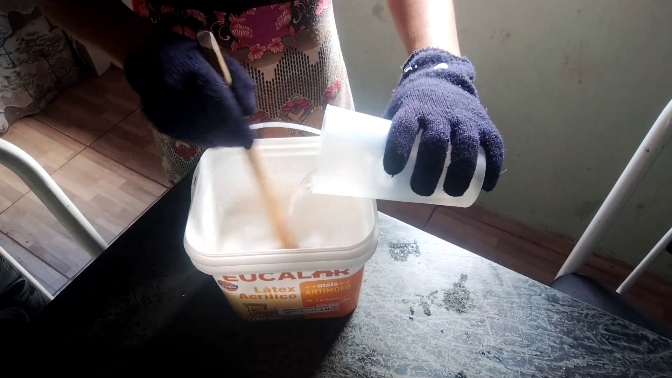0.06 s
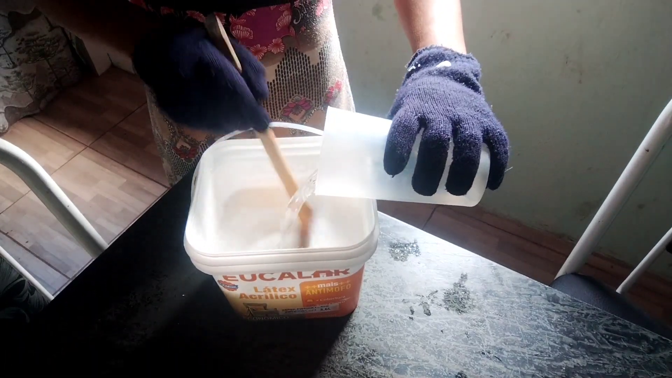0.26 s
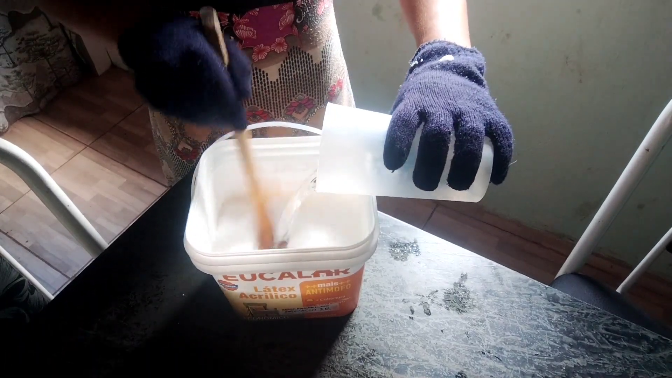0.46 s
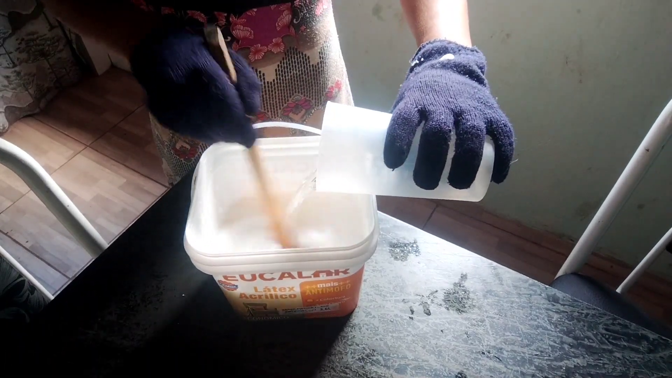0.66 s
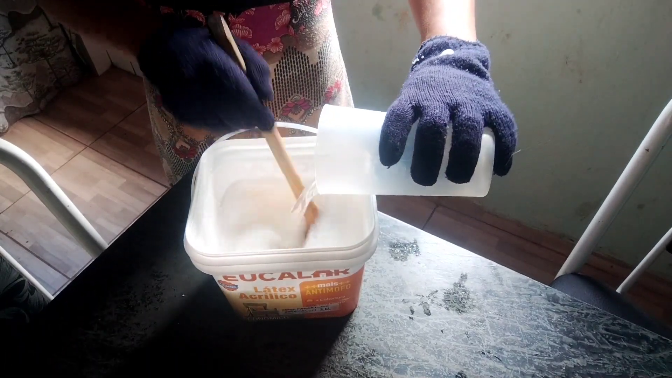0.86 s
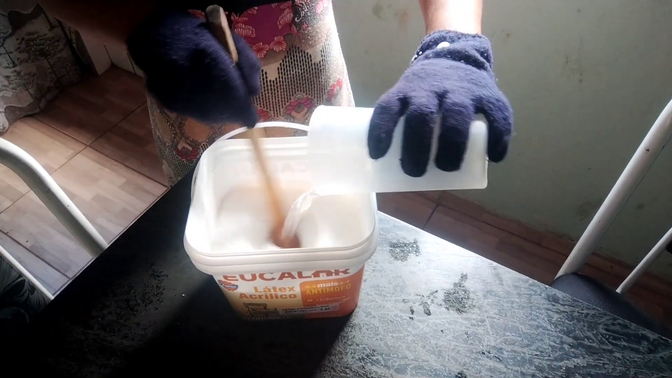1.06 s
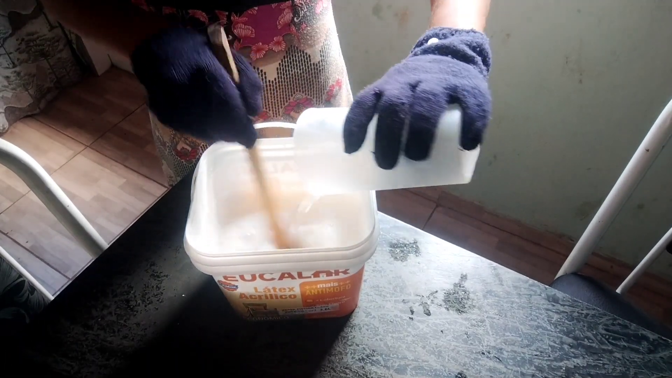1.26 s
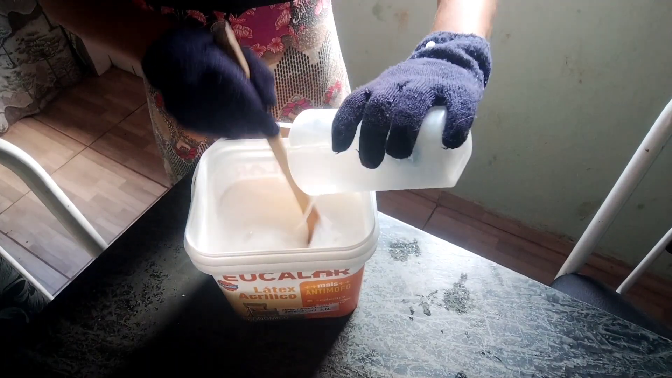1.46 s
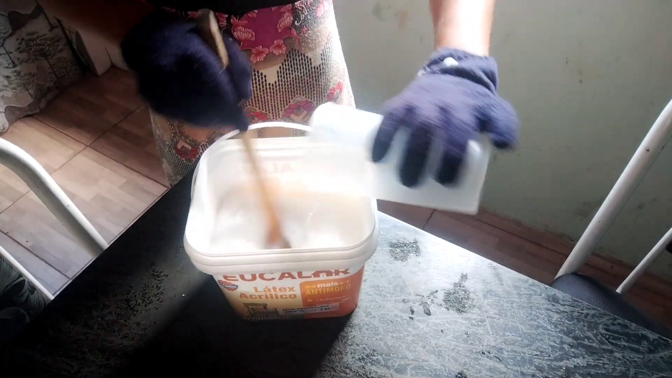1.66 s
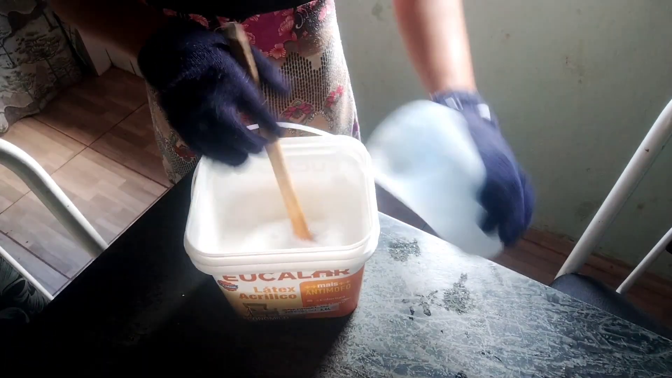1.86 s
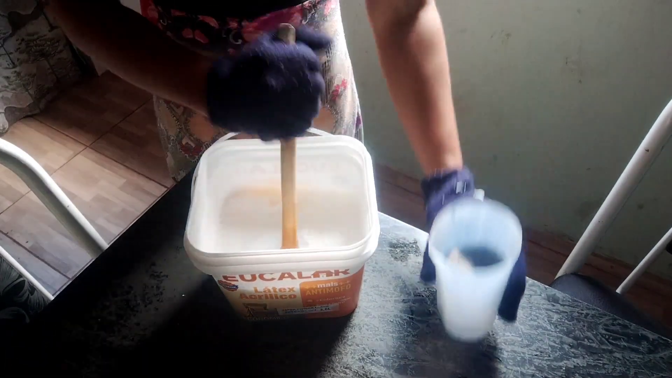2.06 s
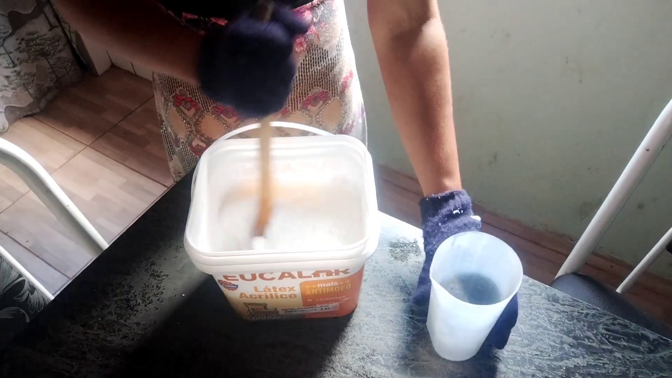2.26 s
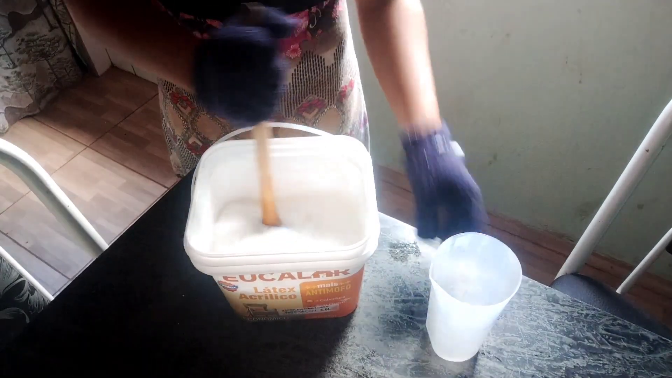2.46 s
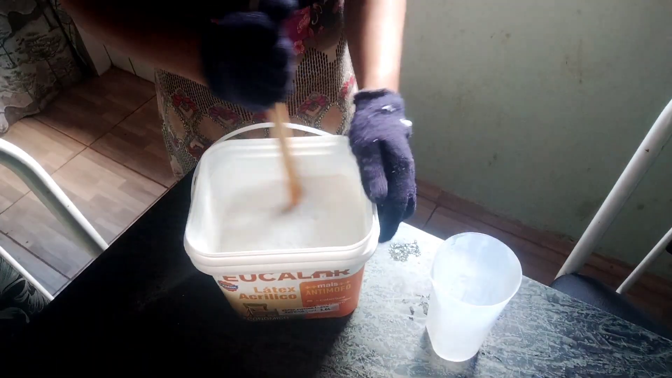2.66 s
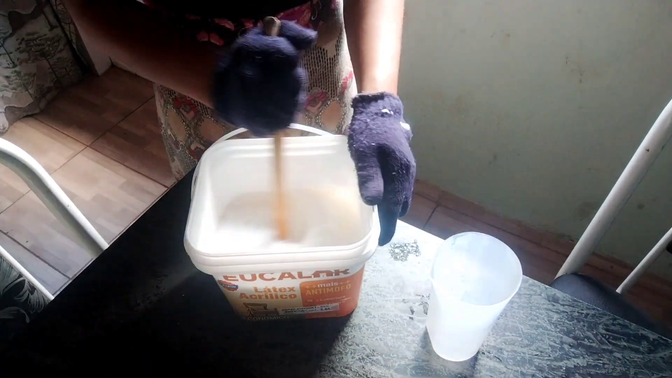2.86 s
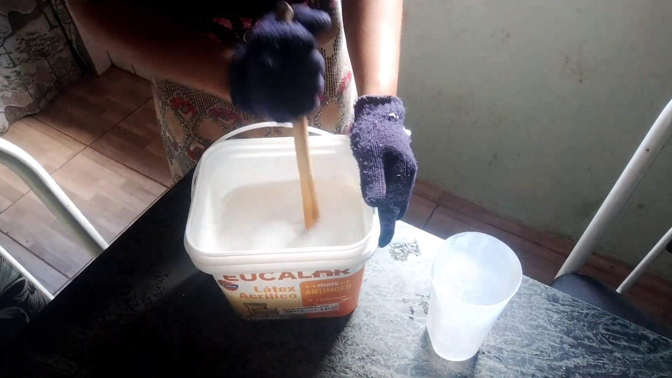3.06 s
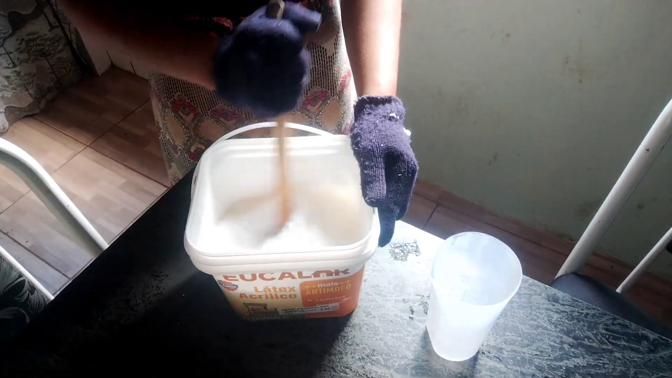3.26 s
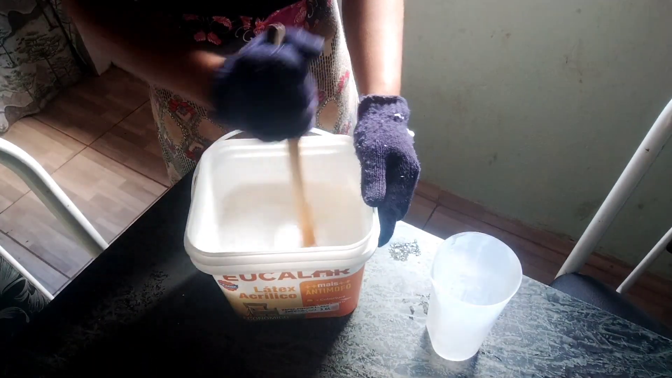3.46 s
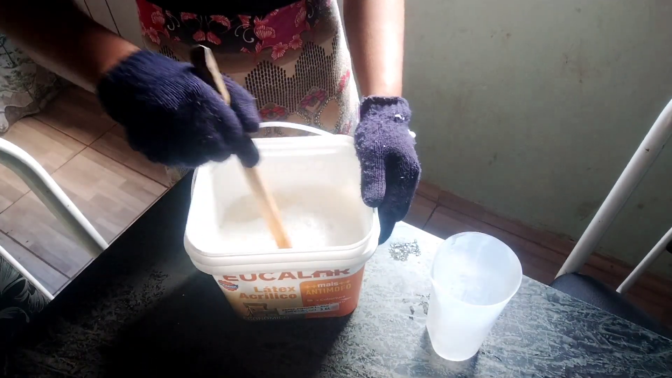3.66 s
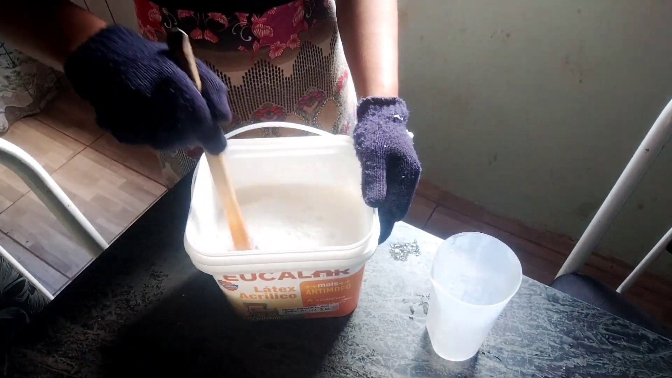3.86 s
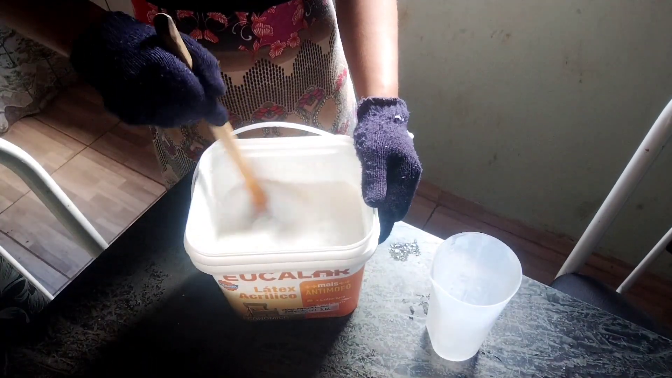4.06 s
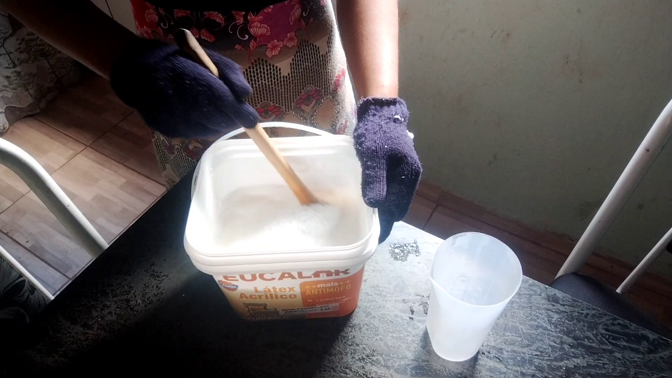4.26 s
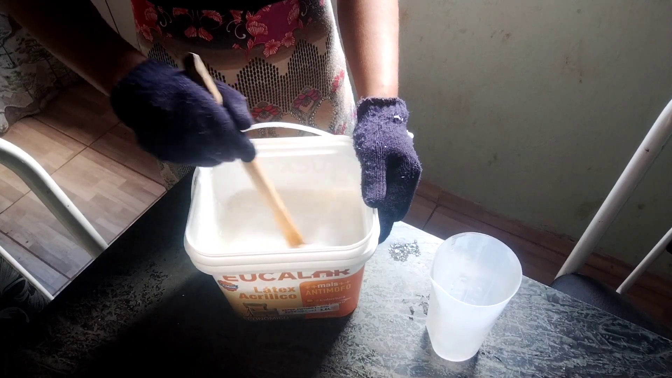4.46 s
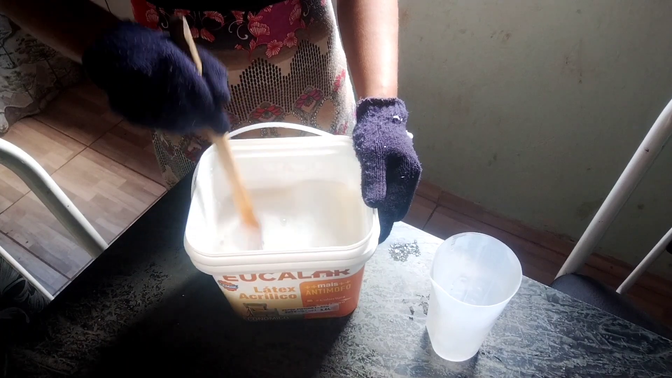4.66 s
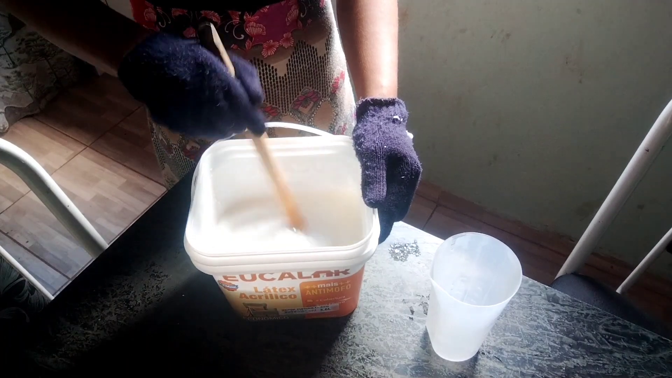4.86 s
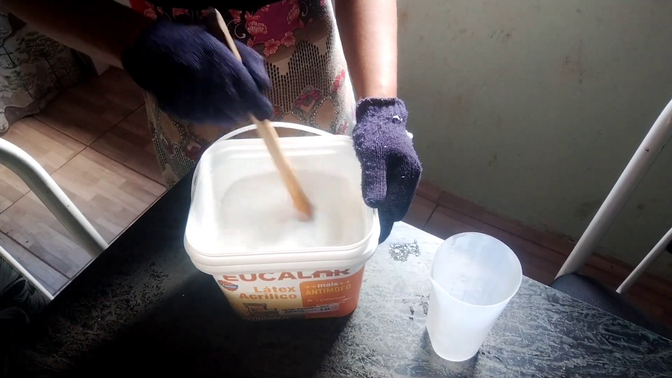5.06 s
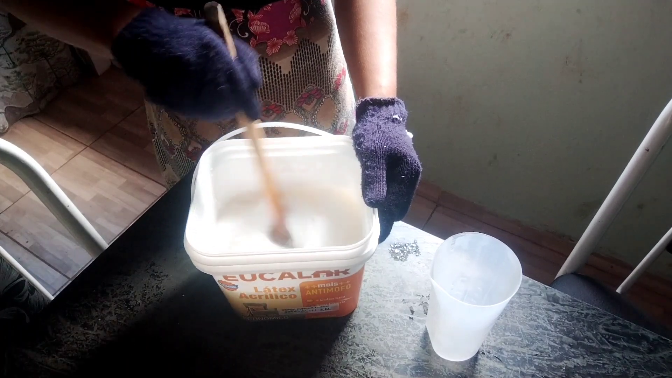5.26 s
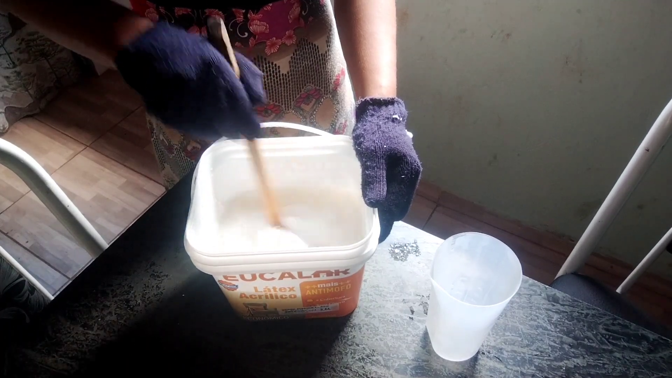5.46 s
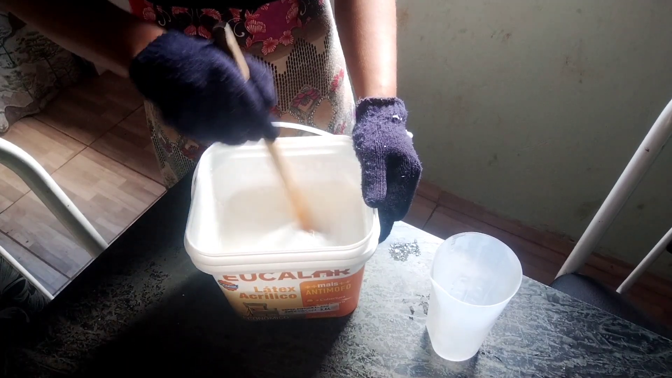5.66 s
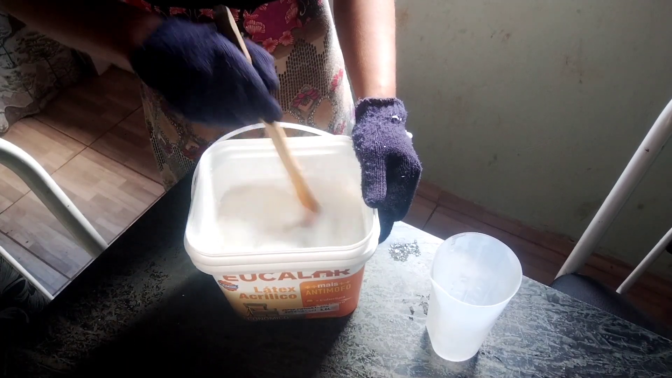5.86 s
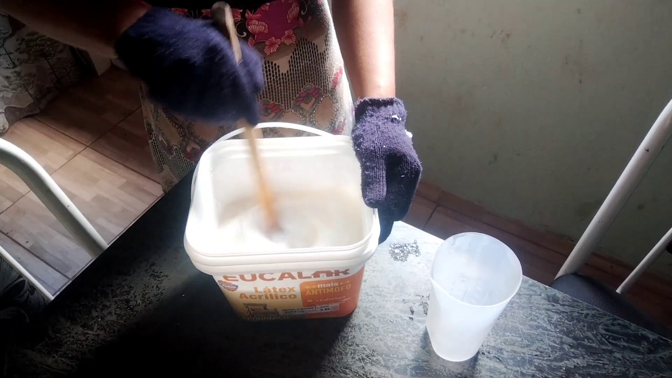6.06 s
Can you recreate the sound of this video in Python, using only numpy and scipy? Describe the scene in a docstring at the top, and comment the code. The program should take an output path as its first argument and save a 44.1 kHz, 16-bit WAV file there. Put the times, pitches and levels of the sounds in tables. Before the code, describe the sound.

Close-up in a small hard-walled room, with a faint steady noise floor. From 0 to 1.8 s a wooden spoon strikes a plastic tub of liquid roughly every 0.3 s: soft, low, hollow thuds with a table boom beneath. Water pours in until about 1.5 s, a bright lumpy trickle with snappy splashes, bubbles and drips, followed by a last wet swish and a few clicks to 1.7 s. At 2.25 s an empty plastic cup lands with a higher hollow clack and several quick, weakening rocking taps until 2.45 s. Near quiet follows, with barely audible glove brushes around 2.7-2.9 s. At 3.54 s a rapid rattle of four knocks restarts the spoon; uneven, woodier knocks continue through 5.1 s, with small tub bumps and sparse wet clicks. A lull precedes weaker knocks from 5.65 to 6 s. Extremely faint thin tones come and go late.

```python
"""Small hard room: a wooden spoon stirs thick liquid in a plastic tub on a table; water is poured in.
Spoon blows are low pushes that ring table, tub and spoon modes; a cup set down rings its own modes.
Splashes are noise snaps, bubble tones and plops; pouring adds lumpy hiss and crackle.
A glove brushes the tub, stirred liquid hums, thin tones come and go over a steady noise floor.
Dense echoes ring briefly; a suppressor lowers everything above the bass when it is quiet."""
import sys
import numpy as np
from scipy import signal
from scipy.fft import rfft, irfft
from scipy.io import wavfile
from scipy.ndimage import uniform_filter1d

SR = 44100
rng = np.random.default_rng(int(sys.argv[2]) if len(sys.argv) > 2 else 0)


def pcm_store(signal):
    """Save signal as 16-bit PCM."""
    levels = np.round(np.clip(np.atleast_2d(signal), -1, 1) * 32767)
    wavfile.write(sys.argv[1], SR, levels.astype(np.int16).T)


N = 269010
T = np.arange(N) / SR  # s
POUR_END_S = 1.5


def undb(db):
    """Amplitude ratio of a level in dB."""
    return 10 ** (np.asarray(db) / 20)


def unit(x):
    """Scale to RMS 1."""
    return x / np.sqrt(np.mean(x ** 2))


def band(x, hz, q):
    """Second-order band-pass, gain 1 at the centre."""
    return signal.lfilter(*signal.iirpeak(hz, q, fs=SR), x)


def colour(x, points):
    """Shape a spectrum by (Hz, dB) points, interpolated over log frequency."""
    hz, db = np.transpose(points)
    f = np.fft.rfftfreq(N, 1 / SR) + 1
    gain = undb(np.interp(np.log(f), np.log(hz), db))
    return irfft(rfft(x) * gain, N)


def add(out, start_s, sound):
    """Mix a sound in place from start_s, cut at the end of out."""
    i = int(start_s * SR)
    n = min(out.shape[-1] - i, sound.shape[-1])
    out[..., i:i + n] += sound[..., :n]


def ring(modes, scatter_db, rise_s, q, clean_db):
    """Struck resonances: each a clear tone in a cluster of close ones (width Hz / q) that beat unevenly."""
    t, y = T[:SR // 2], 0
    settle = SR // 8  # samples of filter run-in, discarded
    for hz, level_db, t60_s in modes:
        fade = np.exp(-np.log(1000) * t / t60_s)
        noise = rng.standard_normal(len(t) + settle)
        cluster = unit(band(band(noise, hz, q), hz, q)[settle:])
        mode = (cluster + undb(clean_db) * np.sin(2 * np.pi * hz * t)) * fade
        # energy set by level and scatter, not by the beating
        mode *= np.sqrt(np.sum(fade ** 2) / np.sum(mode ** 2))
        y = y + undb(level_db + scatter_db * rng.standard_normal()) * mode
    return y * (1 - np.exp(-t / rise_s))


def tap(hz, cycles):
    """Hard contact: a tone that dies within a few cycles."""
    turns = T[:SR // 2] * hz
    return np.sin(2 * np.pi * turns) * np.exp(-turns / cycles)


def burst(hz, q, peak_s):
    """Puff of band noise, quick up to peak_s and slower down."""
    t = T[:SR // 8] / peak_s
    return unit(band(rng.standard_normal(len(t)), hz, q)) * np.e * t * np.exp(-t)


def bubbles(count, span_s, low_hz, top_hz, cycles, spread_db, crowd=1):
    """Bubbles at random moments: short rising tones, each with its own pan; crowd > 1 packs the start."""
    out = np.zeros((2, int(span_s * SR) + SR // 10))
    for moment, pitch, size, side in rng.random((count, 4)):
        hz = min(low_hz * (top_hz / low_hz) ** pitch, 14000)
        turns = T[:int(5 * cycles * SR / hz)] * hz
        tone = np.sin(2 * np.pi * turns * (1 + 0.045 * turns / cycles)) * np.exp(-turns / cycles)
        pan = np.sqrt([[side], [1 - side]])
        add(out, moment ** crowd * span_s, undb(spread_db * size ** 2) * tone * pan)
    return out / np.abs(out).max()


# spoon on tub wall: (start_s, thud_db, contact_hz, boom_db, wall_db); boom and wall relative to thud
SPOON_KNOCKS = [(0.004, -24, 413, -10, -25), (0.293, -21.5, 425, -19, -42), (0.585, -17, 480, -23, -26),
                (0.851, -28, 684, -18, -24), (1.161, -31, 690, -23.5, -24),
                (1.474, -23.5, 420, -15.5, -19.5), (1.782, -27, 663, -18.5, -23),
                (2.127, -50.5, 568, -5, -8.5), (3.541, -30, 657, -34, -10), (3.556, -23, 596, -12, -5),
                (3.568, -26, 413, -26, -5), (3.579, -32.5, 450, -20, -0.5), (3.861, -27.5, 660, -15, -14),
                (4.024, -42, 710, -11, -13), (4.238, -36, 485, -40, -11.5), (4.331, -34, 850, -13.5, -10.5),
                (4.538, -25.5, 598, -18, -10.5), (4.765, -25.5, 456, -20.5, -19.5),
                (5.077, -21, 440, -20, -24.5), (5.664, -49, 390, -15, -15), (5.894, -32.5, 413, -8.5, -36),
                (6.028, -40.5, 510, -7.5, -29)]
# resonances of table top, tub body: (mode_hz, level_db, t60_s)
TABLE_MODES = [(99.2, -9, 0.47), (130.14, 7, 0.44), (183.9, -4, 0.25)]
TUB_MODES = [(225.2, 1, 0.14), (266.4, 5, 0.15), (304.4, -1, 0.077), (347.5, -5, 0.14), (423, -0.5, 0.2),
             (454, -8.5, 0.097)]
# resonances of tub wall, spoon: (mode_hz, level_db, undamped_t60_s)
WALL_MODES = [(566, -2, 0.12), (634, 0.88, 0.17), (802, 0.4, 0.11), (928, -2, 0.098), (1040, -3.9, 0.046),
              (1169, -2.7, 0.043)]
SPOON_MODES = [(1227, -3, 0.1), (1439, 2, 0.098), (1750, -9, 0.11)]
CRACK_DB, CRACK_PER_WALL_DB = -7.5, 0.77  # the harder the wall rings, the sharper the crack
DAMP_PER_WALL_DB = 0.55
THUD_REPEAT_S, THUD_REPEAT_DB = 0.02423, -5  # the thud and tub body sound once more, softer


def damped(modes, wall_db):
    """A glancing blow leaves the spoon against the wall: decay shortens as wall_db falls."""
    return [(hz, db, t60_s * undb(DAMP_PER_WALL_DB * wall_db)) for hz, db, t60_s in modes]


def spoon():
    """A dull push of one or two cycles, then walls, table and spoon ring; the heavy table answers late."""
    out, t = np.zeros(N), T[:SR // 2]
    for start_s, thud_db, contact_hz, boom_db, wall_db in SPOON_KNOCKS:
        crack_db = CRACK_DB + CRACK_PER_WALL_DB * wall_db
        thud = -np.sin(2 * np.pi * 262 * t) * np.exp(-((t - .004) / 0.0028) ** 2)
        body = undb(-20.0) * ring(TUB_MODES, 0.25, 0.0066, 6.7, 0.2)
        boom = ring(TABLE_MODES, 0.42, 0.018, 39.0, 1.3)
        wall = undb(10.0) * tap(contact_hz, 2.4)
        wall += undb(-6) * ring(damped(WALL_MODES, wall_db), 2.84, 0.00061, 10.4, 1.)
        crack = tap(1600 * undb(0.24 * rng.standard_normal()), 4.6)
        add(crack, 0, undb(-14.5) * burst(3600, 1.0, 0.0016))
        # a blow both hard and bright rings the spoon itself
        wood = ring(damped(SPOON_MODES, wall_db), 0.43, 0.000525, 8., 2.)
        knock = thud + body + undb(boom_db) * boom + undb(wall_db) * wall
        knock += undb(crack_db) * crack + undb(wall_db + crack_db) * wood
        add(out, start_s, undb(thud_db) * knock)
        add(out, start_s + THUD_REPEAT_S, undb(thud_db + THUD_REPEAT_DB) * (thud + body))
    return out


# low thumps on the table: the tub rocking back after a side blow, or at 2.4 s the cup settling: (start_s,
# level_db)
TABLE_BUMPS = [(2.402, -46.5), (3.601, -43), (3.884, -40), (4.344, -41.5), (4.563, -32)]
# low resonances the thumps excite: (mode_hz, level_db, t60_s)
BUMP_MODES = [(100, 3.5, 0.18), (182.5, -1.5, 0.086)]


def table_bumps():
    """Each thump excites a few low modes."""
    out = np.zeros(N)
    for start_s, level_db in TABLE_BUMPS:
        add(out, start_s, undb(level_db) * ring(BUMP_MODES, 1.2, 0.0042, 15.0, 4.3))
    return out


SLOSH_DB, SLOSH_DECAY_S = -18.5, 0.053  # level re thud, amplitude decay


def slosh():
    """Power of the liquid that each knock throws about, settling again."""
    out = np.zeros(N)
    for start_s, thud_db, *_ in SPOON_KNOCKS:
        add(out, start_s, undb(thud_db + SLOSH_DB) ** 2 * np.exp(-2 * T[:SR] / SLOSH_DECAY_S))
    return out


# splashes and wet clicks: (start_s, level_db, centre_hz, plop_db); plop relative to splash
SPLASH_EVENTS = [(0.0551, -27.5, 3750, -13.5), (0.171, -44, 2960, 1), (0.245, -34.5, 2460, -6.5),
                 (0.3302, -33, 2320, -13.5), (0.3581, -42.5, 3060, -4.5), (0.4717, -32, 4640, -14),
                 (0.6084, -28.5, 4290, -21), (0.6436, -37, 3900, -16.5), (0.801, -34, 9200, -14),
                 (0.8147, -33, 7350, -16), (0.867, -41, 1810, -17), (0.898, -31.5, 4300, -32),
                 (0.909, -45.5, 4200, -8), (0.9345, -35.5, 2700, -12), (1.064, -37.5, 1205, -2.5),
                 (1.075, -40.5, 4030, -10), (1.1498, -38.5, 3000, -37), (1.212, -35, 3520, -27),
                 (1.2224, -35, 2960, -15), (1.2538, -33, 6500, -15.5), (1.3416, -40, 4900, -12),
                 (1.401, -43, 3160, -32.5), (1.427, -39, 4380, -4), (1.519, -33.5, 3310, -8.5),
                 (1.62, -35, 4660, -9), (1.6455, -41.5, 4700, 1.5), (3.28, -48.5, 1630, -21),
                 (3.596, -38, 8300, -30), (4.225, -47, 3000, -13), (4.2381, -35, 1900, -14),
                 (4.846, -43, 2500, -1.5), (5.8251, -48, 2980, 5), (5.98, -46, 1450, 14)]
SPLASH_S, THROWN_S, CLICK_S = 0.0023, 0.0095, 0.001  # pouring, just after a knock, after pouring
THROWN_WITHIN_S = .075


def splashes():
    """Each is a snap, a spray of bubbles and a plop; longer when a knock has just thrown the liquid."""
    out = np.zeros((2, N))
    for start_s, level_db, hz, plop_db in SPLASH_EVENTS:
        thrown = any(.01 < start_s - knock[0] < THROWN_WITHIN_S for knock in SPOON_KNOCKS[1:])
        length_s = THROWN_S if thrown else SPLASH_S if start_s < POUR_END_S else CLICK_S
        splash = bubbles(count=40, span_s=4 * length_s, low_hz=0.707 * hz, top_hz=1.9 * hz,
                         cycles=4., spread_db=16, crowd=1.5)
        snap = 0.9 * tap(hz, 1.77) + 1.1 * tap(7700, 1.8)
        add(splash, 0, snap * (0.00088 / length_s) ** 0.21)  # more snap in brief ones
        add(splash, 0, undb(-18.5) * np.array([burst(1.5 * hz, .6, length_s) for _ in range(2)]))
        add(splash, 0, undb(plop_db) * burst(716.0, 6.3, length_s))
        add(out, start_s, undb(level_db) * splash)
    return out


# water hiss spectrum: (freq_hz, level_db_per_hz)
FIZZ_SPECTRUM = [(400, -29), (1000, -10), (3000, -7.5), (8000, -6.5), (16000, -14)]


def fizz():
    """Lumpy hiss; bubbles crackle and drip over it while water pours."""
    lumps = undb(3 * unit(uniform_filter1d(rng.standard_normal(N), SR // 40)))
    hiss = unit(colour(lumps * rng.standard_normal((2, N)), FIZZ_SPECTRUM))
    crackle = bubbles(count=700, span_s=POUR_END_S, low_hz=1620, top_hz=12340, cycles=2., spread_db=20)
    drips = bubbles(count=2200, span_s=POUR_END_S, low_hz=1500, top_hz=6000, cycles=6., spread_db=19)
    pour = undb(1.5) * unit(crackle) + undb(-3.0) * unit(drips)
    add(hiss, 0, lumps[:pour.shape[1]] ** 1.72 * pour)
    return hiss


# resonances of the air above the liquid: (mode_hz, q, level_db)
CAVITY_MODES = [(1820, 45, 0), (3380, 41, -14)]


def water(fizz_db):
    """Splashes and fizz also excite the air above the liquid."""
    wet = splashes() + undb(fizz_db) * fizz()
    return wet + sum(undb(level_db) * band(wet, hz, q) for hz, q, level_db in CAVITY_MODES)


# cup set down, rocking to rest: (start_s, level_db, rim_tick_db)
CUP_CONTACTS = [(2.246, -19.5, -42), (2.277, -25, -55), (2.295, -28.5, -66), (2.312, -37.5, -51.5),
                (2.331, -29.5, -78), (2.441, -42.5, -51.5)]
# resonances of the cup: (mode_hz, level_db, t60_s)
CUP_MODES = [(119.7, -15.5, 0.36), (278, -15.5, 0.29), (477, -24.5, 0.12), (515.6, -2.5, 0.115),
             (581.6, 2.5, 0.061), (996, -14.5, 0.046), (1514, -10, 0.036), (1970, -27, 0.083)]


def cup():
    """The thin cup rings higher than the tub, with a rim tick at each contact."""
    out = np.zeros(N)
    for start_s, level_db, tick_db in CUP_CONTACTS:
        body = undb(-7.0) * tap(565, 7.3) + undb(-7.5) * ring(CUP_MODES, 0.82, 0.00077, 14., 4.4)
        tick = burst(3000, 1.0, 0.0014) + 0.58 * tap(1400, 4)[:SR // 8]
        add(out, start_s, undb(level_db) * body)
        add(out, start_s, undb(tick_db) * tick)
    return out


# glove brushing the tub: (start_s, level_db, centre_hz)
GLOVE_BRUSHES = [(2.738, -62.5, 7500), (2.834, -64, 7800), (2.92, -64, 8500)]


def glove():
    """Faint high brushes of cloth: puffs of band noise."""
    out = np.zeros(N)
    for start_s, level_db, hz in GLOVE_BRUSHES:
        add(out, start_s, undb(level_db) * burst(hz, 3.6, 0.012))
    return out


def swirl(level_db):
    """The moving liquid pushes the tub unevenly and keeps table and walls humming."""
    lumps = undb(3 * unit(uniform_filter1d(rng.standard_normal(N), SR // 25)))
    push = rng.standard_normal(N) * lumps
    table = sum(undb(db) * unit(band(push, hz, hz * t60_s / 2.2)) for hz, db, t60_s in TABLE_MODES)
    tub = sum(undb(db) * unit(band(band(push, hz, 6.7), hz, 6.7)) for hz, db, _ in TUB_MODES)
    return undb(level_db) * unit(table + undb(-7.0) * tub)


# echo bands of the room: (centre_hz, t60_s, level_db)
ROOM_BANDS = [(303, 0.36, -17.5), (775, 0.43, -23), (2200, 0.25, -12.5), (6220, 0.59, -5)]


def room(x):
    """Dense decaying echoes band by band; the bass is alike in both channels, the treble is not."""
    t, tail = T[:SR // 2], 0
    for hz, t60_s, level_db in ROOM_BANDS:
        fade = np.exp(-np.log(1000) * t / t60_s)
        mid, side = band(rng.standard_normal((2, len(t))), hz, 0.66) * fade
        both = mid + min(hz / 600, 1.1) * side * np.array([[1], [-1]])
        tail = tail + undb(level_db) * both / np.sqrt(np.sum(mid ** 2))
    tail = tail * (1 - np.exp(-t / .006))
    # a small room holds no dense echoes in the deep bass
    tail = signal.lfilter(*signal.butter(2, 200, "high", fs=SR), tail)
    return signal.fftconvolve(x[None], tail, axes=1)[:, :N]


# noise floor spectrum: (freq_hz, level_db_per_hz)
HUSH_SPECTRUM = [(20, 10.5), (60, -6), (130, -22.5), (400, -7.5), (900, -8.5), (3000, -17), (6000, -15),
                 (16000, -19.5)]
HUSH_DB = -63.5


def hush():
    """Steady coloured noise, wider in the treble than in the bass."""
    mid, side = colour(rng.standard_normal((2, N)), HUSH_SPECTRUM)
    side = signal.lfilter(*signal.butter(1, 400, "high", fs=SR), side)
    return undb(HUSH_DB) * unit(mid + 1.12 * side * np.array([[1], [-1]]))


# faint thin tones: (start_s, length_s, pitch_hz, level_db)
THIN_TONES = [(2.98, 2.8, 5366, -80.5), (4.387, 0.45, 2950, -74.5), (5.88, 0.3, 7160, -73)]


def whines():
    """Narrow-band noise heard as thin tones, with 20 ms fades."""
    out = np.zeros(N)
    for start_s, length_s, hz, level_db in THIN_TONES:
        thin = unit(band(band(rng.standard_normal(N), hz, 120.), hz, 120.))
        edge_s = np.minimum(T - start_s, start_s + length_s - T)
        out += undb(level_db) * thin * np.clip(edge_s * 50, 0, 1)
    return out


# stirring and water over time: (time_s, swirl_db, fizz_db)
STIR_LEVELS = [(0, -44, -72), (.55, -55.5, -63), (1.2, -62.5, -69.5), (1.55, -45.5, -51.5),
               (1.679, -52, -63), (1.798, -61, -67), (2.1, -74, -60), (2.351, -39.5, -61.5),
               (2.55, -67, -99), (2.72, -63.5, -76), (3.151, -67, -66.5), (3.248, -51.5, -64),
               (4.2, -64, -63.5), (4.501, -57, -66), (5.42, -57.5, -64.5), (5.652, -51, -69.5),
               (6.1, -50.5, -65)]
SPRAY_DB, SPRAY_RISE_S = -24.5, 0.0083  # level re slosh, smoothing time


def scene():
    """Knocks feed swirl and, during the pour, fizz; solids and water excite the room."""
    time_s, swirl_db, fizz_db = np.transpose(STIR_LEVELS)
    slosh_power = slosh()
    swirl_power = undb(np.interp(T, time_s, swirl_db)) ** 2 + slosh_power
    solid = spoon() + table_bumps() + cup() + glove() + swirl(10 * np.log10(swirl_power))
    step = 1 / (SPRAY_RISE_S * SR)
    spray_power = undb(SPRAY_DB) ** 2 * signal.lfilter([step], [1, step - 1], slosh_power)
    fizz_power = undb(np.interp(T, time_s, fizz_db)) ** 2 + spray_power * (T < POUR_END_S)
    wet = water(10 * np.log10(fizz_power))
    echoes = room(solid + undb(-6.5) * wet.mean(0))
    return solid + wet + echoes + hush() + whines()


TOP_HZ = 15800


def record(dry):
    """A suppressor lowers all above the bass as its level falls past a threshold; bass and top are cut."""
    upper = signal.lfilter(*signal.butter(1, 300, "high", fs=SR), dry)
    power = uniform_filter1d(upper.mean(0) ** 2, SR // 50, origin=SR // 120)  # 20 ms, mostly past
    loud_db = 10 * np.log10(power + 1e-12)
    shut = 1 / (1 + np.exp((loud_db + 52.5) / 2.7))  # 0 open, 1 shut; half at -52.5 dB
    y = dry - upper + upper * undb(-7 * shut)
    y = signal.sosfilt(signal.butter(3, 72, "high", fs=SR, output="sos"), y)
    return signal.sosfilt(signal.ellip(8, .2, 70, TOP_HZ, fs=SR, output="sos"), y)


dry = scene()
out = record(dry)
pcm_store(out)
```